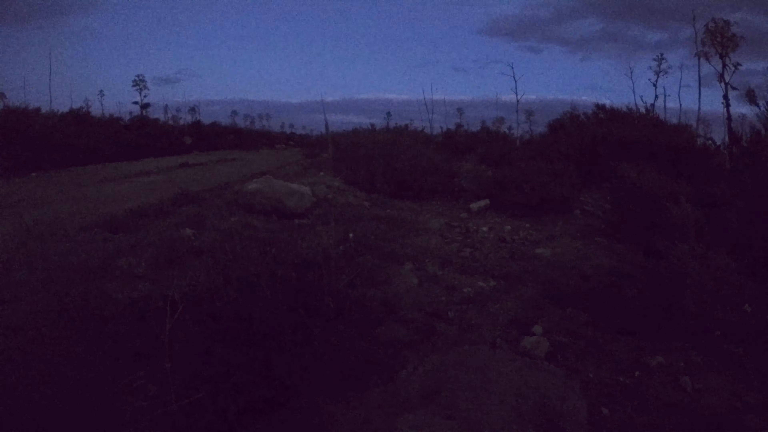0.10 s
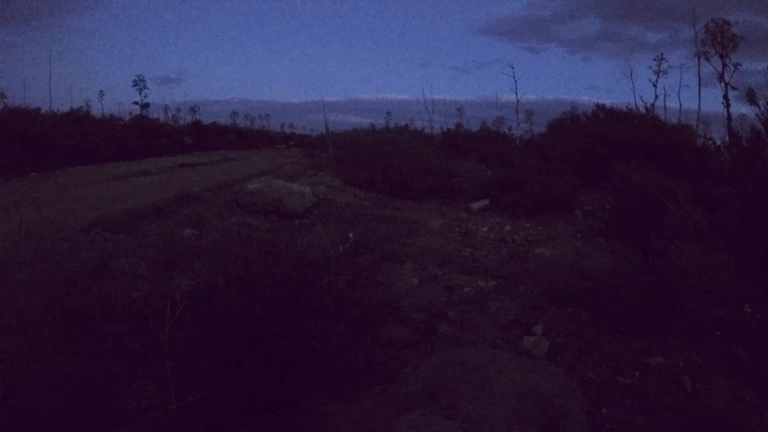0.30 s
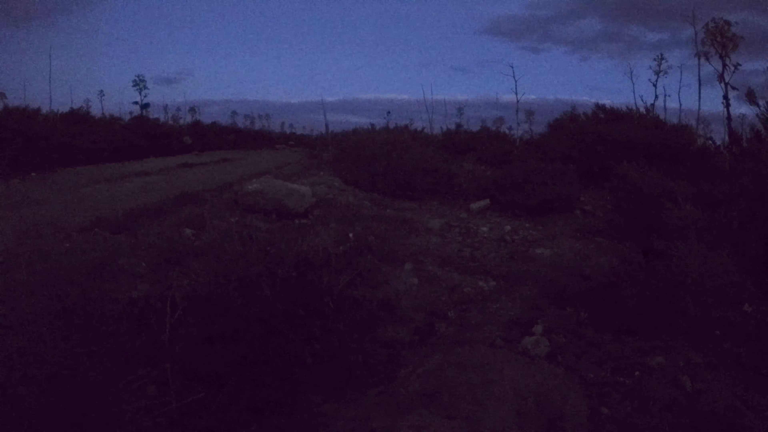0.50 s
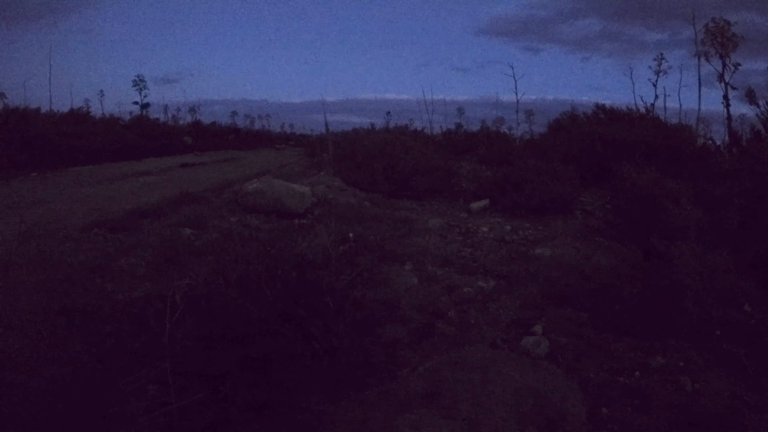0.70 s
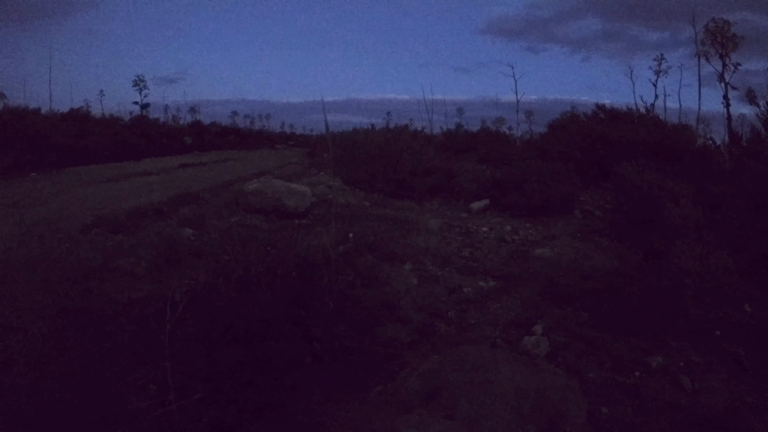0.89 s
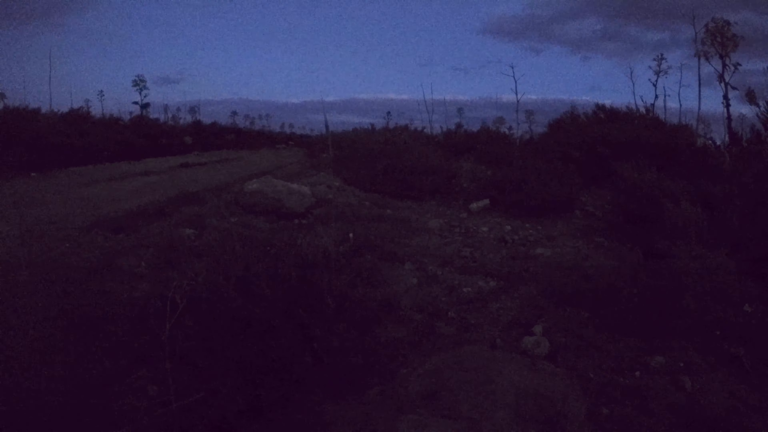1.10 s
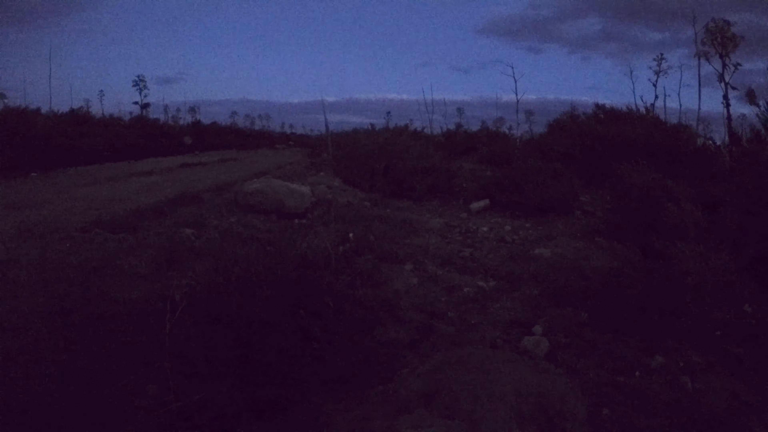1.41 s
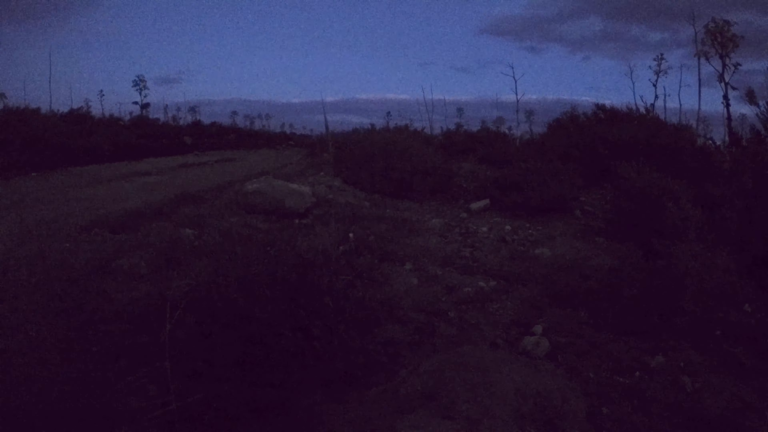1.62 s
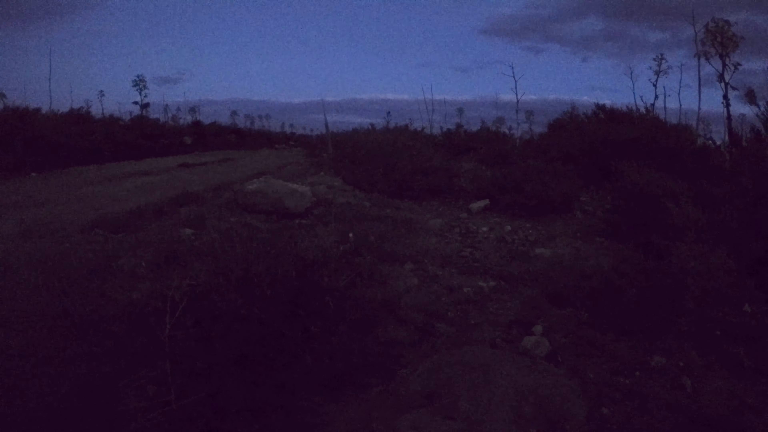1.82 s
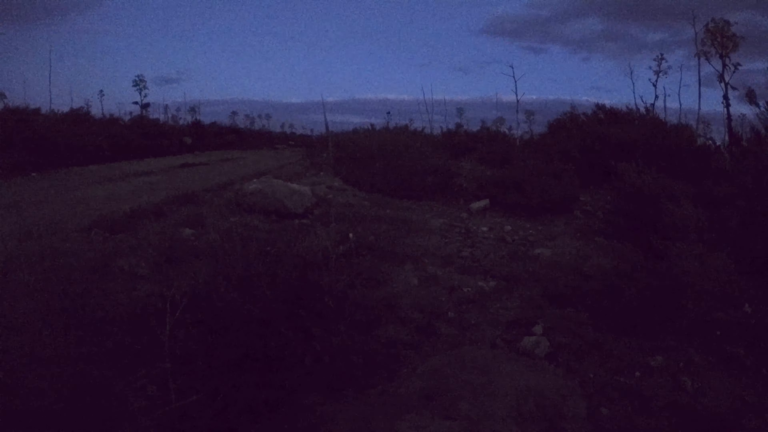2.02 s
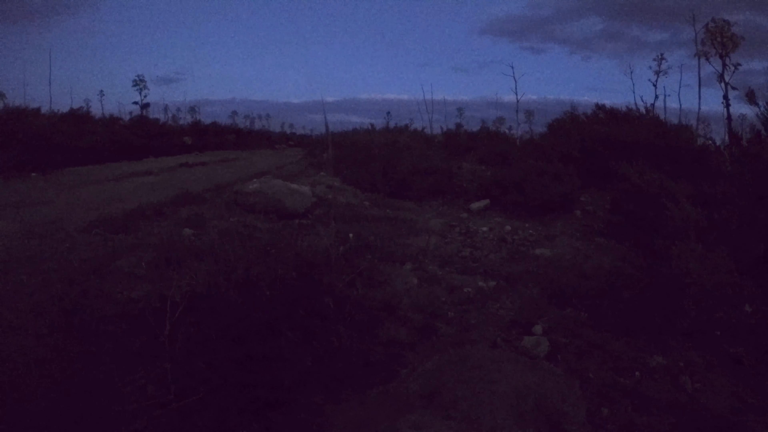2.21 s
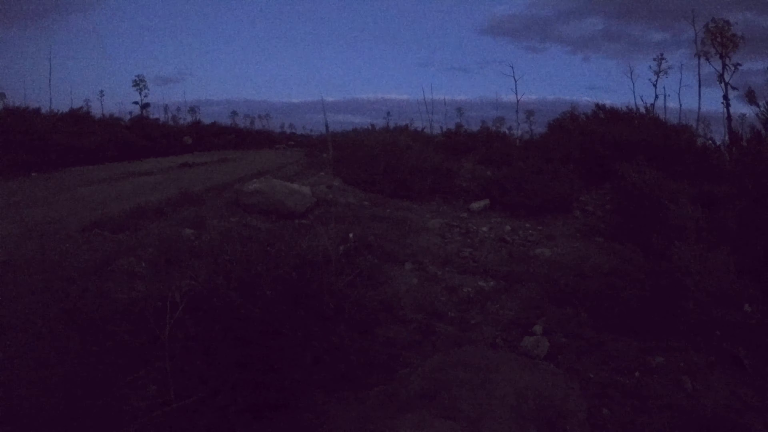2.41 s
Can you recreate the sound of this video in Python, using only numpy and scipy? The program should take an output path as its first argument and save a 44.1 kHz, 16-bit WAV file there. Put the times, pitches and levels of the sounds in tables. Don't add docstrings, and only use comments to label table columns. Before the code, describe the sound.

Fingers bump and rub a loosely mounted camera, felt directly by its stereo microphones as boxy clacks and soft thumps in uneven clusters; a distant bird trills rapidly in open scrub under light wind and steady hiss.

```python
import sys
import numpy as np
from scipy import signal
from scipy.fft import rfft, irfft
from scipy.io import wavfile
from scipy.ndimage import uniform_filter1d

SR = 44100
rng = np.random.default_rng(int(sys.argv[2]) if len(sys.argv) > 2 else 0)


def rack_gain(trim_db):
    fader = np.asarray(trim_db, float)
    return 10 ** (fader / 20)


def put_to_file(sound):
    columns = np.atleast_2d(sound).T
    safe = np.clip(columns, -1, 1)
    whole_steps = np.round(safe * 32767)
    wavfile.write(sys.argv[1], SR, whole_steps.astype(np.int16))


N = 112455

# frequency in Hz, left minus right in dB, left lead in rad.
EARS = [(25.3, -4, -0.3), (150, -14.5, 2.5), (186, -8, 1.0), (218, 0.5, 2.15), (289, -0.5, 2.5),
        (500, -8.5, 2.5), (685, -7, 3), (790, -4.5, 2.5), (1080, -2, 2.5), (2000, 0, 2.5), (3800, -2, 1.8)]
# frequency in Hz, density in dB per Hz.
HISS_SPECTRUM = [(300, 14), (1500, 4), (4000, -2.5), (9500, 0), (12000, -9), (14000, -27.5)]
# frequency in Hz, density in dB per Hz.
WIND_SPECTRUM = [(33, -6), (55, -9.5), (100, -16), (400, -35)]
# time in seconds, strength in dB.
GUSTS = [
    (0, 1),
    (.2, 3.5),
    (.55, 2.5),
    (.7, -2.5),
    (1.2, -3),
    (1.4, -2.5),
    (2.1, 4),
    (2.3, -6),
    (2.55, -3),
]
# time in seconds, level in dB.
SWAY = [(0, -47.5), (.21, -35), (.4, -38.5), (.6, -39.5), (.73, -44.5), (.85, -34), (1.2, -46.5),
        (1.45, -46.5), (1.8, -36), (2.0, -29), (2.2, -28), (2.4, -34.5), (2.55, -39.5)]
# time in seconds, level in dB.
CHURR = [
    (0, -89),
    (.15, -60),
    (.55, -59),
    (.64, -88),
    (.8, -53.5),
    (1.4, -48),
    (1.65, -59),
    (2.32, -65.5),
    (2.34, -53.5),
    (2.55, -58.5),
]
# start in seconds, length in seconds, start in Hz, glide in Hz, level in dB.
SQUEAKS = [
    (.575, .065, 3100, 320, -63),
    (1.552, .03, 3350, -100, -58),
    (1.735, .045, 3350, -100, -59),
]
# time in seconds, pressure in dB.
RUB = [(0, -58.5), (.17, -50), (.3, -43), (.45, -38), (.57, -43.5), (.63, -55.5), (.8, -41), (.96, -36.5),
       (1.22, -42), (1.32, -42.5), (1.45, -46), (1.65, -44.5), (1.76, -39.5), (1.92, -38.5), (2.07, -43),
       (2.21, -49.5), (2.3, -51)]
# frequency in Hz, t60 in seconds, level in dB.
SHELL = [(319.5, 0.0072, 0.5), (509.4, 0.024, -1), (610.2, 0.028, -6.5), (657.5, 0.038, -1),
         (829, 0.023, -7), (917.5, 0.024, -15.5), (1147, 0.027, -6.5), (1194.5, 0.019, 7),
         (1356.5, 0.025, 2), (1950, 0.012, -5), (2640, 0.0069, -13.5), (3160, 0.0047, -18),
         (3650, 0.0032, -25)]
# frequency in Hz, t60 in seconds, level in dB.
MOUNT = [(149.2, 0.072, 1.4), (177.8, 0.093, -1.14), (220, 0.071, 0.7)]
# start in seconds, peak in dB, ring in Hz, t60 in
# seconds.
TICKS = [(.22, -42, 2480, 0.0075), (.222, -38, 1950, 0.0072), (0.38, -46, 2700, 0.0087),
         (.383, -57, 4200, .004), (.488, -44.5, 2650, .012), (.495, -46.5, 2610, 0.015),
         (.504, -44.5, 2640, 0.015), (.491, -18, 795, 0.027), (.504, -20.5, 784, 0.022),
         (.561, -34.5, 2640, 0.01), (.562, -49.5, 4600, 0.0033), (0.714, -55, 3430, 0.0034),
         (.995, -55, 2460, 0.0065), (1.012, -47.5, 3190, .012), (1.029, -41.5, 3300, .004),
         (1.079, -45, 2600, .006), (1.139, -44.5, 2900, 0.0063), (1.14, -56.5, 5700, .005),
         (1.147, -21, 810, .03), (1.159, -44.5, 3540, 0.0037), (1.16, -54, 5700, .005),
         (1.193, -52, 2700, .006), (1.198, -21, 810, 0.027), (1.246, -56, 2470, .006),
         (1.267, -40.5, 3260, .006), (1.267, -48, 4700, 0.0024), (1.266, -48.5, 5980, .006),
         (1.573, -47.5, 2400, .01), (1.675, -52, 2480, 0.0071), (1.737, -50.5, 3300, 0.0042),
         (1.806, -45, 3300, .004), (1.808, -56, 4150, .005), (1.825, -48.5, 2900, .005),
         (1.876, -44, 3300, 0.0024), (1.878, -56.5, 4600, .004), (1.949, -52, 2690, .005),
         (1.975, -39, 2900, .004), (1.976, -47, 4780, .002), (2.11, -38.5, 3270, 0.0036),
         (2.11, -45.5, 4300, 0.0029), (2.111, -54.5, 6000, .008), (.689, -24.5, 1234, 0.018),
         (1.083, -38, 1950, 0.0092), (.497, -34.5, 1720, 0.0045), (.493, -21.5, 500, 0.034),
         (0.224, -40, 2260, 0.0088)]
# start in seconds, peak in dB, low mode in dB, high mode in dB.
THUDS = [(0.23, -31, -35, 3.5), (0.382, -18, -3.5, -14), (0.444, -32, -23, -0.5), (0.498, -23, -1.5, -7.5),
         (0.574, -30.5, -8, -2), (0.721, -16, -3.5, -7.5), (0.738, -42, 2.5, -6), (0.862, -20.5, 1.5, 1),
         (0.884, -21.5, -27, -39), (0.999, -9.5, -13, -9.5), (1.029, -4.5, -5.5, -11),
         (1.054, -8, -35, -28.5), (1.074, -18.5, -23.5, -25.5), (1.144, -21.5, -45, 0),
         (1.171, -27, -8, 1.5), (1.195, -30, -35, -17), (1.269, -8, 3, -10.5), (1.495, -31.5, -2.5, -32),
         (1.545, -32, -28, -12), (1.576, -28.5, -1, -11), (1.678, -18.5, -1, -17), (1.733, -30, -5, -3.5),
         (1.829, -15, -7, -26), (1.85, -19.5, -5.5, -10), (1.88, -16, -28, -4), (1.913, -19.5, -23, -24.5),
         (1.951, -14, 1, -13.5), (1.972, 0.5, -6.5, -19), (2.113, -11.5, -3, -10)]
# start in seconds, peak in dB,
# bright modes in dB.
MORE_SNAPS = [(0.207, -29.5, -16), (0.404, -26.5, -45.5), (0.443, -24, -23), (0.505, -29, -24),
              (0.53, -26.5, -26), (0.68, -22, -45), (0.883, -19, -20.5), (0.922, -28.5, -14),
              (1.011, -18, -23), (1.044, -6.5, -29), (1.065, -12, -21.5), (1.08, -23, -13), (1.118, -23, -34),
              (1.171, -14, -42), (1.284, -18.5, -47), (1.489, -28.5, -26), (1.737, -27, -11.5),
              (1.787, -27, -20), (1.894, -14.5, -28), (1.984, -11, -50), (2.129, -24, -27), (2.231, -29, -46),
              (2.242, -28.5, -21)]
# start in seconds, peak in dB, bright modes in dB, dull modes in dB.
SNAPS = [(0.22, -14.5, -11, -10.5), (0.226, -31, -34, 5), (0.267, -32, -18, 12.5), (0.331, -27.5, -35, 3.5),
         (0.378, -13.5, -14.5, -56), (0.49, -19, -10, 0), (0.496, -25, -48, -33), (0.561, -10, -11.5, -41),
         (0.692, -7.5, -45, -18.5), (0.719, -17.5, -25, -8.5), (0.734, -12.5, -32.5, -15),
         (0.855, -17.5, -15, -24), (0.868, -17, -25, -3.5), (0.997, -9, -14.5, -7), (1.03, -7.5, -15.5, -8),
         (1.131, -22, -4.5, -16), (1.14, -13, -14.5, -36), (1.16, -21.5, -5.5, -35), (1.195, -12, -49, -30),
         (1.246, -20.5, -14.5, -3), (1.269, -10, -14.5, 0), (1.543, -21, -18, -1),
         (1.572, -19.5, -17.5, -2.5), (1.678, -13.5, -21, -5.5), (1.809, -19, -11.5, 2),
         (1.826, -18, -14.5, 2.5), (1.877, -14, -12.5, -2.5), (1.948, -9.5, -22.5, -8),
         (1.973, -2, -22, -3), (2.11, -23, -1, 1)]

DULL_HZ, BRIGHT_HZ, CRISP_HZ = 600, 1000, 2300


def evened(x):
    return x / np.sqrt(np.mean(abs(x) ** 2) + 1e-20)


def curve(table):
    return np.interp(np.arange(N) / SR, *np.transpose(table))


def coloured(points, count):
    hz = np.fft.rfftfreq(N, 1 / SR)
    f, db = np.transpose(points)
    shape = rack_gain(np.interp(np.log(hz + 1), np.log(f), db, -90, -90))
    white = rng.standard_normal((count, N))
    return irfft(rfft(white) * shape, N), hz, shape


def decay_rate(t60):
    return np.log(1000) / (t60 * SR)


def ring(force, hz, t60):
    pole = np.exp(2j * np.pi * hz / SR - decay_rate(t60))
    return signal.lfilter([1], [1, -2 * pole, pole ** 2], force + 0j)


def pair(z, hz):
    f, left_db, lead_rad = np.transpose(EARS)
    gain = rack_gain(np.interp(hz, f, left_db))
    turn = np.exp(1j * np.interp(hz, f, lead_rad))
    return np.array([(gain * turn * z).imag, z.imag])


def add(mix, s, sound):
    part = mix[:, round(s * SR):][:, :sound.shape[1]]
    part += sound[:, :part.shape[1]]


def hiss():
    noise, hz, shape = coloured(HISS_SPECTRUM, count=2)
    treble_scale = np.sqrt((shape ** 2).sum() / (shape[hz > 3000] ** 2).sum())
    side_db = np.array([[3.0], [8.0]])
    creep_db = 1.9 * np.arange(N) / SR
    return evened(noise) * treble_scale * rack_gain(-65.5 + side_db - creep_db)


def wind():
    noise = coloured(WIND_SPECTRUM, count=3)[0]
    lumps = rack_gain(1.0 * evened(uniform_filter1d(rng.standard_normal(N), 5000)))
    shared = noise[0] * rack_gain([[-5.0], [0]])
    return evened(shared + 0.077 * noise[1:]) * lumps * rack_gain(-44 + curve(GUSTS))


def sway():
    sway_hz = 25
    z = np.exp(2j * np.pi * sway_hz * np.arange(N) / SR)
    return pair(z * rack_gain(curve(SWAY) + 4.5), sway_hz)


def churr():
    notes_per_s, note_s, note_hz = 37.2, 0.014, 1322
    glide, wander, scrub_t60 = 0.18, 0.027, 0.4
    t = np.arange(N) / SR
    since = (t * notes_per_s % 1) / notes_per_s
    progress = np.minimum(since / note_s, 1)
    drift = wander * evened(uniform_filter1d(rng.standard_normal(N), size=4000))
    hz = note_hz * (1 + drift + glide * (0.5 - progress))
    notes = np.exp(2j * np.pi * np.cumsum(hz) / SR) * np.sin(np.pi * progress) ** 2
    sparse = (rng.random(12000) < 0.03) * rng.standard_normal(12000)
    echoes = sparse * rack_gain(-60 * t[:12000] / scrub_t60)
    song = evened(signal.oaconvolve(notes, echoes)[:N])
    return pair(song * rack_gain(curve(CHURR) + 10.5), note_hz)


def squeak(length, hz, glide_hz, db):
    u = np.arange(0, 1, 1 / (length * SR))
    tone = np.exp(2j * np.pi * np.cumsum(hz + glide_hz * u) / SR)
    return pair(rack_gain(db) * tone * np.sin(np.pi * u), hz)


def rubbing():
    grit = rack_gain(0 * evened(uniform_filter1d(rng.standard_normal(N), 300)))
    force = evened(rng.standard_normal(N) * grit) * rack_gain(curve(RUB) + 7)
    out = 0
    for hz, t60, db in SHELL + MOUNT:
        if hz > BRIGHT_HZ:
            tone_db = -15
        elif hz < 300:
            tone_db = -9
        else:
            tone_db = -6 if hz < DULL_HZ else -1
        even_power = 2 * decay_rate(t60) ** (3 / 2)
        out = out + pair(ring(force, hz, t60) * even_power * rack_gain(db + tone_db), hz)
    return out


def tick(db, hz, t60):
    t, strike_s = np.arange(4000) / SR, 0.005
    force = rng.standard_normal(len(t)) * t / strike_s * np.exp(-t / strike_s * 2)
    z = ring(force, hz, t60)
    crack = ring(force, hz, t60 / 3.5)
    both = z / abs(z).max() + rack_gain(3) * crack / abs(crack).max()
    return pair(both * rack_gain(db - 0.5), hz)


def thud(db, low_db, high_db):
    t, push_s, rise_s = np.arange(12000) / SR, 0.0043, 0.0067
    push = np.sin(2 * np.pi * t / push_s) * np.sin(np.pi * t / push_s) ** 2
    push = np.where(t < push_s, push, 0)
    out = 0
    for (hz, t60, mode_db), tone_db in zip(MOUNT, [low_db, 0, high_db]):
        z = ring(push, hz, t60)
        out = out + pair(z / abs(z).max() * rack_gain(mode_db + tone_db), hz)
    return rack_gain(db + 6) * out * np.minimum(t / rise_s, 1)


def snap(db, bright_db, dull_db=-10):
    t, rise_s, scrape_s = np.arange(6000) / SR, 0.0006, 0.0043
    force = uniform_filter1d(rng.standard_normal(len(t)), size=5)
    force = force * np.minimum(t / rise_s, 1) ** 2 * np.exp(-t / scrape_s)
    force = signal.sosfilt(signal.butter(2, 200, 'high', fs=SR, output='sos'), force)
    out = 0
    for hz, t60, mode_db in SHELL:
        level_chance, pitch_chance = rng.standard_normal(2)
        z = ring(force, hz * (1 + 0.012 * pitch_chance), t60)
        if hz > BRIGHT_HZ:
            tone_db = bright_db - 12 * (hz > CRISP_HZ)
        else:
            tone_db = dull_db if hz < DULL_HZ else 0
        out = out + pair(z / abs(z).max() * rack_gain(mode_db + tone_db + 1.5 * level_chance), hz)
    return rack_gain(db + 5) * out


def scene():
    mix = hiss() + wind() + sway() + churr() + rubbing()
    for s, *row in SQUEAKS:
        add(mix, s, squeak(*row))
    for s, *row in TICKS:
        add(mix, s - 0.001, tick(*row))
    for s, *row in THUDS:
        add(mix, s, thud(*row))
    for s, *row in SNAPS + MORE_SNAPS:
        add(mix, s - 0.001, snap(*row))
    return mix


def band_limit(x):
    return signal.sosfilt(signal.butter(12, 14160, fs=SR, output="sos"), x)


def record(dry):
    limit_db, recover_db_per_s, squeeze = -10, 82.5, 0.75
    power_db = 10 * np.log10(uniform_filter1d((dry ** 2).max(0), 300) + 1e-12)
    fall_db = np.arange(N) * recover_db_per_s / SR
    held_db = np.maximum.accumulate(power_db + fall_db) - fall_db
    over_db = np.maximum(held_db - limit_db, 0)
    ducked = dry / rack_gain(squeeze * uniform_filter1d(over_db, 200))
    return band_limit(ducked / (1 + abs(ducked) ** 4) ** (1 / 4))


dry = scene()
out = record(dry)
put_to_file(out)
```